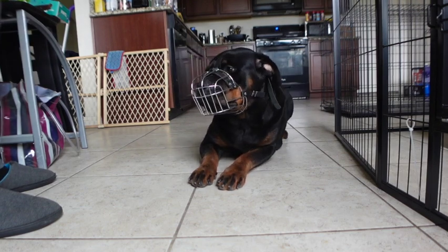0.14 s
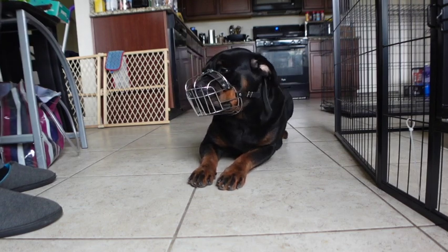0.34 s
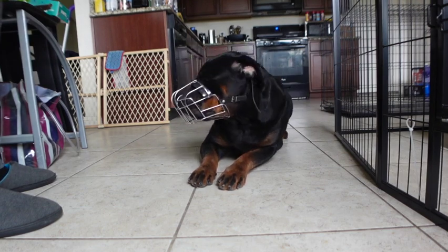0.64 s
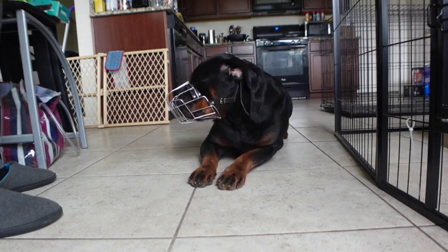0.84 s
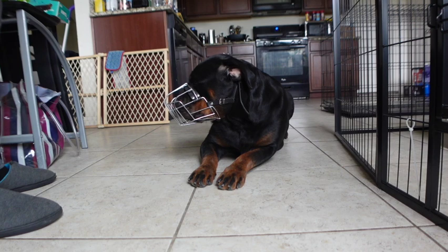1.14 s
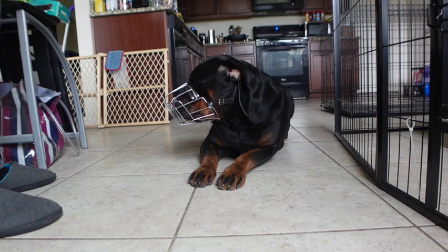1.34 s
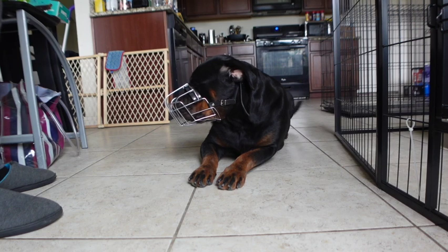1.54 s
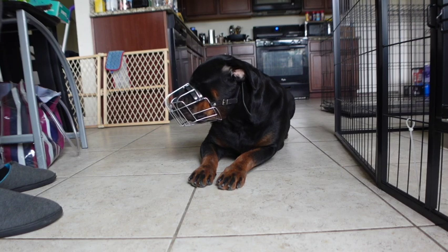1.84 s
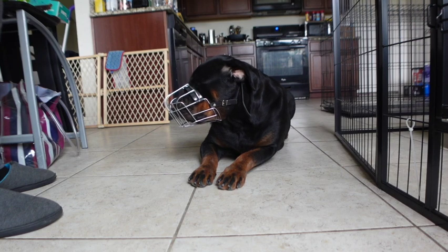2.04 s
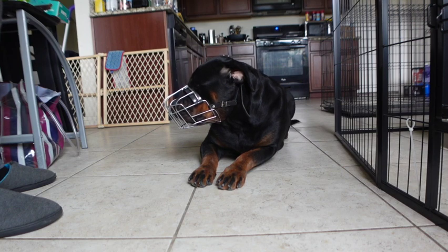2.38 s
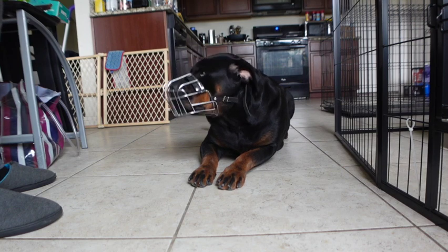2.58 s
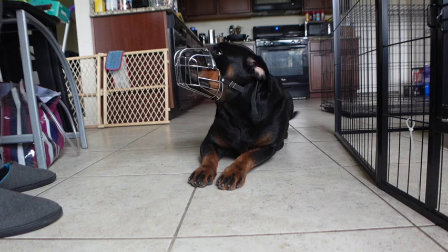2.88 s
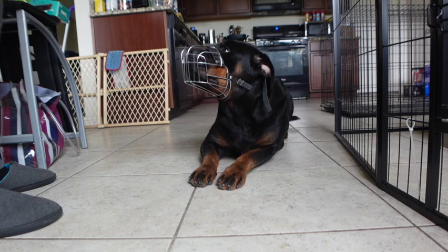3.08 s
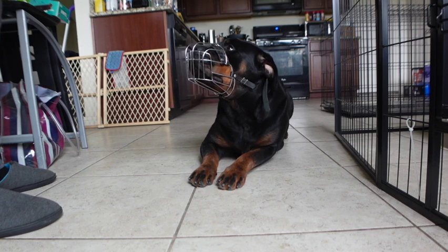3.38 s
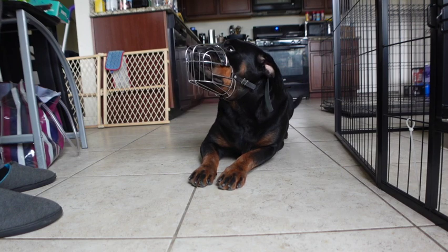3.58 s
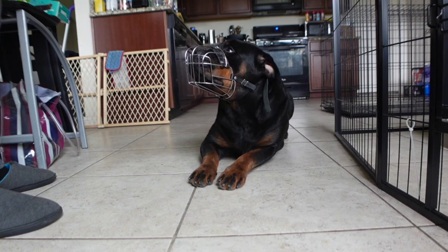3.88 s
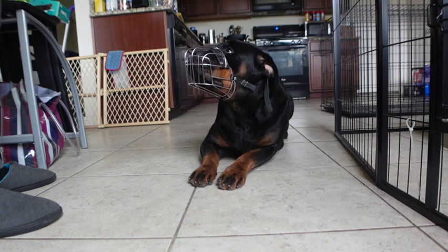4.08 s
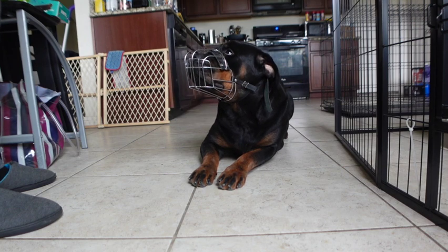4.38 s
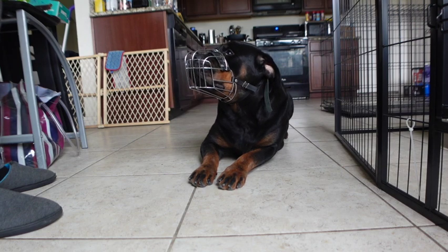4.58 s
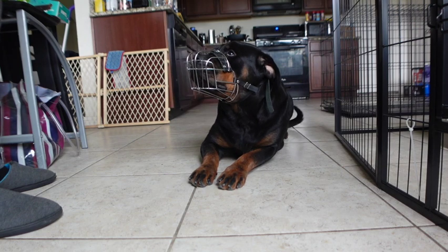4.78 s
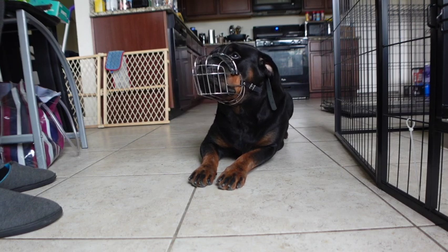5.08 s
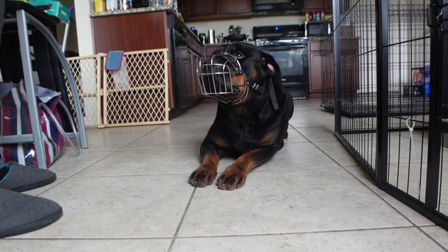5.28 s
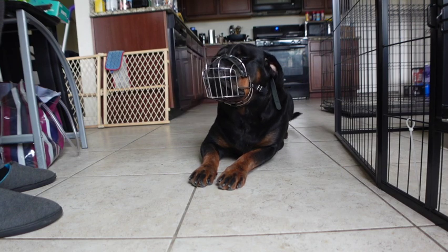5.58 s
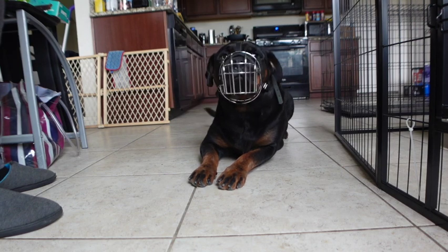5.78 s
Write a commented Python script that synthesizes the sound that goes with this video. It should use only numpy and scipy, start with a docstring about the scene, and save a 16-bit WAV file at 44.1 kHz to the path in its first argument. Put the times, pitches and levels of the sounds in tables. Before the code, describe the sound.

Several unseen young puppies cry in a hard tiled kitchen: a short rising whimper, a sharp yelp breaking into a shriek, a wavering wail, then a high squeal. After a faint paired whine come a falling yelp, trembling wails and long whines that sag and climb to the end. Low house hum, grainy uneven hiss, soft scuffs and small ticks sit beneath. The microphone is at some distance, so room echo is as loud as the voices.

```python
"""Hungry puppies cry in a tiled kitchen, one after another and sometimes two at once, over hum and uneven hiss.
First a rising whimper, a yelp into a shriek and squeal, a wavering wail crossed by a yip, and a high squeal.
Then faint paired whines, a falling yelp and a trembling wail; scuffs and ticks join the sagging, climbing whines.
Cries are gliding harmonics shaped by mouth and throat, with rasp and air, smeared by decaying room noise.
Scuffs and ticks are bursts of coloured noise; the hiss is continuous and grainy, the hum steady and low."""
import sys
import numpy as np
from scipy import signal
from scipy.fft import rfft, irfft, next_fast_len
from scipy.io import wavfile

SR = 44100
rng = np.random.default_rng(int(sys.argv[2]) if len(sys.argv) > 2 else 0)


def master_out(mix):
    """Clip the mix to full scale and print it as 16-bit PCM to the path in sys.argv[1]."""
    frames = np.transpose(np.atleast_2d(mix))
    ceiling = np.clip(frames, -1, 1)
    pcm = np.round(ceiling * 32767).astype(np.int16)
    wavfile.write(sys.argv[1], SR, pcm)


N = 261513
TIME = np.arange(N) / SR
TOP_HZ = 15900  # upper limit of the voices and of the recorder


def undb(db):
    """Turn decibels into gain."""
    return 10 ** (np.asarray(db) / 20)


def unit(x):
    """Scale to rms 1."""
    return x / np.sqrt(np.mean(x ** 2))


def at_hz(points, hz):
    """Read (hz, value) points on a log-frequency axis."""
    point_hz, value = np.transpose(points)
    return np.interp(np.log(np.maximum(hz, 1)), np.log(point_hz), value)


def bins(size):
    """Frequencies of a real spectrum, in Hz."""
    return np.arange(size // 2 + 1) * SR / size


def colour(x, points):
    """Filter by a (hz, gain_db) curve."""
    return irfft(rfft(x) * undb(at_hz(points, bins(len(x)))), len(x))


def band(x, lo_hz, hi_hz):
    """Keep one sharp-edged band."""
    hz = bins(len(x))
    return irfft(rfft(x) * ((hz >= lo_hz) & (hz < hi_hz)), len(x))


def resonance(hz, centre_hz, width_hz):
    """Gain of one resonance, 1 at its centre."""
    return 1 / (1 + (2 * (hz - centre_hz) / width_hz) ** 2)


def noise(centre_hz, width_hz, size=N):
    """Noise of rms 1 in one soft-edged resonance; centred on 0 it is a random wobble."""
    padded = next_fast_len(size, True)
    spectrum = rfft(rng.standard_normal(padded)) * resonance(bins(padded), centre_hz, width_hz)
    return unit(irfft(spectrum, padded)[:size])


def flicker(t, rate_hz):
    """A level that glides to a new random value rate_hz times a second."""
    knots = np.arange(t.min(), t.max(), 1 / rate_hz)
    return np.interp(t, knots, rng.standard_normal(len(knots)))


def stereo(mid, side, side_db):
    """Left and right from mid and side."""
    return mid + np.array([[1], [-1]]) * undb(side_db) * side


# spectrum of the house murmur: hz, gain_db
HUM_COLOUR = [(60, -10.5), (128, -12.5), (240, 4), (442, -6), (750, -3.5), (1980, -41)]
HUM_DB = -57.5  # mid level between 100 and 400 Hz


def hum():
    """Steady low murmur of the house: coloured noise, with a weaker independent side signal."""
    mid, side = (colour(rng.standard_normal(N), HUM_COLOUR) for _ in range(2))
    return stereo(mid, side, -11) * undb(HUM_DB) / np.std(band(mid, 100, 400))


# spectrum shared by the hiss and the ticks: hz, gain_db
HISS_COLOUR = [(100, -45), (850, 3.5), (1200, 13), (3400, 5.5), (5500, 4.5), (7500, 2), (15500, -2)]
# swells of the hiss: peak_s, rise_s, fall_s, level_db (from 5.8 to 7 kHz, before the trim)
HISS_SWELLS = [(.08, 0.14, 0.1, -51), (1.43, 0.089, 0.075, -51.5), (2.45, 0.024, 0.35, -54.5),
               (3.321, 0.0028, 0.12, -46.5), (3.75, 0.14, 0.44, -52), (4.44, 0.016, 0.94, -52.5),
               (4.8, 0.19, 0.038, -45.5), (5.08, 0.23, 0.17, -48), (5.601, 0.42, 0.03, -54),
               (5.899, 0.27, 0.092, -49.5)]
HISS_REST_DB = -59.5  # floor between swells, before the trim


def hiss(trim_db=-3.0, grain_db=1.0, flicker_db=1.5, crackle_db=2.0):
    """Grainy background hiss, continuous noise whose level rises and falls, sometimes abruptly."""
    roughness = undb(grain_db * noise(0, 4400) + crackle_db * noise(0, 480))
    grains = colour(rng.standard_normal(N) * roughness, HISS_COLOUR)
    grains = grains / np.std(band(grains, 5800, 7000))
    power = undb(HISS_REST_DB) ** 2
    for peak_s, rise_s, fall_s, level_db in HISS_SWELLS:
        distance = np.maximum((peak_s - TIME) / rise_s, (TIME - peak_s) / fall_s)
        power = power + (undb(level_db) * np.exp(-distance)) ** 2
    return grains * np.sqrt(power) * undb(trim_db + flicker_db * noise(0, 18))


# how long the kitchen rings: hz, reverberation_time_s
ROOM_RING = [(500, .59), (3000, 0.66), (8000, 0.56), (14000, 0.24)]


def room_tail(build_s=0.00031):
    """Dense reflections off tiles and cabinets, of unit energy; the highest treble dies first."""
    t = TIME[:SR]
    source = rng.standard_normal(SR)
    edges = np.geomspace(100, SR / 2, 10)
    tail = 0
    for lo, hi in zip(edges, edges[1:]):
        ring_s = at_hz(ROOM_RING, np.sqrt(lo * hi))
        tail = tail + band(source, lo, hi) * np.exp(-np.log(1000) * t / ring_s)  # 60 dB down at ring_s
    tail = tail * (1 - np.exp(-t / build_s))
    return tail / np.sqrt(np.sum(tail ** 2))


def kitchen(x, direct_db, wet_db, side_db=-10):
    """Direct sound plus the room, which reaches the two close microphones almost alike."""
    mid, side = (signal.fftconvolve(x, room_tail())[:N] for _ in range(2))
    return undb(direct_db) * x + undb(wet_db) * stereo(mid, side, side_db)


# small sharp ticks: start_s, level_db (before the trim and the colour)
TICKS = [(4.2214, -40), (4.962, -39), (5.0562, -36), (5.1275, -38), (5.833, -36), (5.855, -33.5)]


def ticks(decay_s=0.0026, trim_db=3):
    """Tiny hard contacts: noise that starts at once and dies within milliseconds."""
    blows = sum(undb(db + trim_db) * np.exp(-abs(TIME - s) / decay_s) * (TIME >= s) for s, db in TICKS)
    return colour(blows * rng.standard_normal(N), HISS_COLOUR)


# scuffs on the floor: peak_s, length_s, centre_hz, width_hz, level_db (before the patchiness)
SCUFFS = [(3.41, 0.06, 346, 125, -49), (4.043, 0.059, 5300, 1534, -46), (4.372, 0.12, 172, 71, -56.5),
          (5.03, 0.098, 1210, 940, -39), (5.072, 0.063, 3600, 2000, -44.5)]


def scuffs(patchy_db=3.5):
    """Short uneven scrapes, each noise in its own resonance under a bell-shaped swell."""
    patchy = undb(patchy_db * noise(0, 190))
    scrapes = 0
    for peak_s, length_s, centre_hz, width_hz, level_db in SCUFFS:
        swell = np.exp(-((TIME - peak_s) / length_s) ** 2)
        scrapes = scrapes + undb(level_db) * swell * noise(centre_hz, width_hz)
    return scrapes * patchy


# the mouth resonance favours the second or third harmonic; closing takes a share of the cry
MOUTH_WIDTH_HZ, CLOSING_SHARE = 493, 0.081
MOUTH_LEAK_DB = -9  # some of the second harmonic always gets past


def mouth_harmonics(pitch, closed, open_hz, closed_hz):
    """Gains of the second and third harmonics, trading strength as the mouth resonance and pitch move."""
    centre_hz = open_hz + (closed_hz - open_hz) * closed
    mouth = resonance(np.outer([2, 3], pitch), centre_hz, MOUTH_WIDTH_HZ)
    lower = mouth[0] + undb(MOUTH_LEAK_DB)
    return np.array([lower, mouth[1]]) / np.hypot(lower, mouth[1])


# the shrill top is beamed forward and fades as the puppies face away: time_s, level_db (above 7 kHz)
FACING = [(2.1, 5.5), (3.1, -10), (5.5, -19)]
SHRILL_BUILD_S, OVERTONE_FLICKER_DB, OVERTONE_FLICKER_HZ = .025, 3, 39.5


def throat_overtones(t, start, pitch, phase, k, throat):
    """Higher harmonics slide through fixed throat resonances, each flickering by itself."""
    weight = undb(at_hz(throat, k * pitch)) * (k * pitch < TOP_HZ)
    facing = undb(np.interp(t, *np.transpose(FACING)))
    shrill = facing * np.tanh(np.maximum(t - start, 0) / SHRILL_BUILD_S)
    beam = np.where(k * pitch > 7000, shrill, 1)
    uneven = undb(OVERTONE_FLICKER_DB * np.array([flicker(t, OVERTONE_FLICKER_HZ) for _ in k]))
    overtones = (beam * uneven * weight * np.sin(k * phase)).sum(axis=0)
    return overtones / np.sqrt((weight ** 2).sum(axis=0))


# brief narrow resonances of the muzzle: peak_s, length_s, centre_hz, level_db (relative to the cry)
MUZZLE_RINGS = [(1.1, .03, 2920, -1), (1.808, 0.054, 4243, -10), (4.16, .037, 4490, -10.5),
                (5.44, 0.047, 4305, -13), (5.6, 0.22, 3730, -23.5), (5.867, 0.097, 3200, -28)]
MUZZLE_WIDTH_HZ = 150


def muzzle_ring(t, pitch, phase, k):
    """A narrow muzzle resonance opens briefly and makes an overtone near it ring."""
    ring = 0
    for peak_s, length_s, centre_hz, level_db in MUZZLE_RINGS:
        opening = undb(level_db) * np.exp(-((t - peak_s) / length_s) ** 2)
        ring = ring + opening * resonance(k * pitch, centre_hz, MUZZLE_WIDTH_HZ)
    return (ring * np.sin(k * phase)).sum(axis=0)


# throat and muzzle above the third harmonic, mouth half closed: hz, gain_db
THROAT = [(2000, 61), (2750, 28), (3050, 7), (3500, 3), (3760, 14), (4020, 6.5), (4400, 11.5), (5200, -18),
          (6500, -44), (7500, 4), (8600, 20), (10200, 6), (12500, -5), (15000, -20)]
# the same with the mouth wide open: hz, gain_db
OPEN_THROAT = [(3200, 11.5), (3650, 10), (4500, -6.5), (5450, -3), (6300, -22), (7700, -12.5), (9800, -2.5),
               (11200, -16), (12600, -16), (14500, -36)]
# cries starting between these times, the shriek and the squeal after it, have the jaw wide open
WIDE_OPEN_FROM_S, WIDE_OPEN_TO_S = .45, .9
# each cry scoops up to its held pitch, swells, holds and fades; higher pitch is also louder
SCOOP_OCTAVES_PER_S, SCOOP_MAX_OCTAVES, FADE_DB, EFFORT_DB_PER_OCTAVE = 12, .63, 12.5, 3.5
# the body quivers, so loudness and pitch pulse together
QUIVER_HZ, QUIVER_WIDTH_HZ, QUIVER_DB, QUIVER_PITCH_SHARE = 19, 21, 0.78, .0025
# the lowest resonance of the throat carries the fundamental
PHARYNX_HZ, PHARYNX_WIDTH_HZ = 950, 730
ATTACK_S, RELEASE_S = .012, .01
# trim of overtones and air, their loss as the mouth closes, and air gain per unit of rasp
OVERTONE_TRIM_DB, CLOSED_DULL_DB, AIR_PER_RASP = -2, 6.5, 5.8


def cry(start, level_db, swell_s, swell_db, fade_s, fundamental_db, upper_db, open_hz, closed_hz,
        closes_s, tremor, rasp, half_db, held):
    """One squeal: trembling vocal folds, rasp around each harmonic and weak tones halfway between the lower ones."""
    held_s, held_hz = np.transpose(held)
    end = held_s[-1]
    on = (TIME > start - ATTACK_S) & (TIME < end + RELEASE_S)
    t = TIME[on]
    scoop = np.clip(SCOOP_OCTAVES_PER_S * (held_s[0] - np.maximum(t, start)), 0, SCOOP_MAX_OCTAVES)
    pitch = np.interp(t, held_s, held_hz) * 2 ** -scoop
    middle_pitch = np.median(pitch)

    swell = np.interp(t - start, [0, swell_s], [-swell_db, 0])
    fade = np.interp(end - t, [0, fade_s], [-FADE_DB, 0])
    effort = EFFORT_DB_PER_OCTAVE * np.log2(pitch / middle_pitch)
    envelope = undb(level_db + swell + fade + effort)

    closed = (1 + np.tanh((t - closes_s) / (CLOSING_SHARE * (end - start)))) / 2
    second, third = mouth_harmonics(pitch, closed, open_hz, closed_hz)
    first = undb(fundamental_db) * resonance(pitch, PHARYNX_HZ, PHARYNX_WIDTH_HZ)

    # slack folds, where the pitch is low, wobble most
    slack = (middle_pitch / pitch) ** 3
    quiver = noise(QUIVER_HZ, QUIVER_WIDTH_HZ, t.size)
    tremble = tremor * slack * noise(36.2, 60.7, t.size)
    pitch = pitch * (1 + tremble + QUIVER_PITCH_SHARE * quiver)

    # uneven cycles: timing and strength both scatter
    phase = 2 * np.pi * np.cumsum(pitch) / SR + .5 * rasp * noise(0, 920, t.size)
    strength = undb(QUIVER_DB * quiver) + rasp * noise(0, 250, t.size)
    voice = first * np.sin(phase) + second * np.sin(2 * phase) + third * np.sin(3 * phase)

    # alternating strong and weak cycles come and go
    doubling = undb(half_db) * second * noise(0, 720, t.size)
    voice = voice + doubling * np.cos(phase / 2) * (np.sin(phase) + np.sin(2 * phase))

    throat = OPEN_THROAT if WIDE_OPEN_FROM_S < start < WIDE_OPEN_TO_S else THROAT
    k = np.arange(4, 22)[:, None]  # harmonic numbers
    overtones = throat_overtones(t, start, pitch, phase, k, throat)
    voice = voice + muzzle_ring(t, pitch, phase, k)

    # breath noise passes the folds once a cycle, more in a hoarse cry
    breath = unit(colour(band(rng.standard_normal(t.size), 2600, TOP_HZ), throat))
    air = AIR_PER_RASP * rasp * breath * (1 + np.cos(phase)) / 2
    upper_gain = undb(upper_db + OVERTONE_TRIM_DB - CLOSED_DULL_DB * closed)
    voice = voice + upper_gain * (overtones + air)

    gate = np.interp(t, [start - ATTACK_S, start, end, end + RELEASE_S], [0, 1, 1, 0])
    out = np.zeros(N)
    out[on] = np.sqrt(2) * voice * envelope * strength * gate
    return out


# the cries: start_s, level_db, swell_s, swell_depth_db, fade_s, fundamental_db,
# overtones_db (before trim and dulling), mouth_open_hz, mouth_closed_hz,
# mouth_closes_s (midpoint, may lie outside the cry), tremor_share, rasp_share, half_pitch_db,
# held_pitch as (time_s, pitch_hz) points up to the end
CRIES = [ (-.02, -35.5, 0.023, 7.7, 0.096, 0.5, -9, 1520, 2130, 0.074, 0.0064, 0.12, -47, [(0, 569),
         (.05, 609), (.095, 736), (.15, 755)]),
         (.415, -35.5, 0.03, 10.6, .0033, -2.5, -20, 2220, 2490, 0.47, 0.015, 0.31, -45, [(.46, 880),
         (.49, 1008)]),
         (.486, -21.5, .014, 15, 0.063, -14.5, -5.5, 2595, 2300, 0.6, 0.0084, .018, -44, [(.487, 992),
         (.502, 930), (.522, 900), (.565, 920.6), (.603, 902), (.616, 812.6), (.675, 818)]),
         (.68, -27, 0.047, 1.6, 0.096, -4, -22, 2300, 2070, .79, 0.0059, .012, -50, [(.708, 1069),
         (.85, 1040)]),
         (1.075, -33, 0.066, 13, 0.051, 2.5, -20, 2206, 2160, 1.34, 0.021, 0.058, -34.5, [(1.15, 898),
         (1.195, 784), (1.28, 829.3), (1.32, 790), (1.395, 841.5), (1.43, 1101), (1.475, 972)]),
         (1.365, -38.5, .016, 6.1, .0031, -17, -13.5, 1500, 1650, 1.66, 0.046, .074, -24, [(1.405, 711),
         (1.46, 704)]),
         (1.73, -24, 0.13, 12.3, 0.0098, -3, -15.5, 2390, 2175, 1.76, 0.0086, 0.087, -23, [(1.732, 935.3),
         (1.77, 968.6), (1.8, 1100), (1.825, 1100)]),
         (1.82, -28.5, 0.0048, 1.3, 0.056, -3.5, -23.5, 2080, 1820, 2.2, 0.0041, 0.028, -23.5, [(1.822, 1099),
         (2.01, 1059), (2.105, 1030), (2.135, 902)]),
         (2.3, -37.5, 0.15, 13.4, 0.1, -6.5, -20.5, 1960, 1790, 2.52, .013, 0.071, -17, [(2.302, 682.4),
         (2.42, 709), (2.49, 733.2), (2.66, 722.2)]),
         (2.675, -42.5, 0.05, 12.4, 0.019, -10, -6, 1440, 1310, 2.73, 0.032, 0.17, -8, [(2.68, 667.6),
         (2.735, 567)]),
         (2.3, -45.5, 0.079, 6.4, 0.23, -3.5, -20, 2580, 2480, 2, 0.028, 0.14, -4, [(2.302, 731),
         (2.375, 918), (2.58, 962)]),
         (2.972, -31, 0.079, 20.3, .097, -2, -15.5, 2105, 2120, 3.7, 0.016, 0.12, -38, [(3.03, 864),
         (3.065, 880.3), (3.11, 707.5), (3.17, 556), (3.22, 488)]),
         (3.45, -28.5, 0.14, 9.1, 0.012, -3.5, -7, 2180, 1910, 3.6, 0.019, 0.083, -43, [(3.505, 898.6),
         (3.56, 828), (3.615, 848)]),
         (3.62, -22, 0.016, 3.6, 0.05, -10.5, -21, 1690, 1760, 3.84, 0.013, 0.045, -37, [(3.63, 907.3),
         (3.79, 873), (3.86, 826.7), (3.915, 766)]),
         (4.12, -27, 0.11, 13, 0.11, -13, -12.5, 2055, 1710, 4.23, 0.0054, 0.049, -37, [(4.121, 931),
         (4.16, 906), (4.2, 818.6), (4.26, 747), (4.38, 712.6)]),
         (4.36, -27.5, 0.084, 3.6, 0.035, -10, -44, 1500, 1660, 5.3, 0.0062, 0.026, -50, [(4.362, 725.7),
         (4.46, 816.5), (4.58, 887)]),
         (4.58, -25, 0.22, 7.3, 0.045, -19, -28, 1910, 1705, 4.45, 0.0024, 0.018, -51, [(4.581, 884),
         (4.67, 888.6), (4.75, 868.5), (4.9, 855)]),
         (4.16, -42.5, 0.024, 4.7, 0.072, -1, -24, 2200, 2050, 4.26, 0.014, 0.054, -7.5, [(4.165, 981.5),
         (4.24, 1096), (4.32, 1112)]),
         (4.495, -34, .045, 3.6, 0.045, -5, -26, 2180, 1550, 4.63, 0.02, 0.053, -24, [(4.53, 902.4),
         (4.57, 1014), (4.61, 928), (4.645, 715.6), (4.73, 696)]),
         (4.83, -41.5, 0.032, 11, 0.024, 1.5, -15, 1500, 1450, 4.86, 0.021, .04, -35, [(4.84, 731),
         (4.885, 688)]),
         (5.16, -30, 0.18, 13.2, 0.14, -10.5, -17.5, 1900, 2150, 5.23, 0.0066, .03, -18.5, [(5.162, 637.4),
         (5.39, 706.7), (5.44, 746), (5.56, 727)]),
         (5.5, -23.5, 0.2, 7.3, .005, -9, -19.5, 1730, 1440, 4.4, 0.0031, 0.03, -31.5, [(5.502, 728.2),
         (5.72, 775.4), (5.83, 798.5), (5.94, 793.8)])]


def litter():
    """All the puppies' cries, each row a trembling voice; some long cries run on through two rows in turn."""
    return sum(cry(*call) for call in CRIES)


def scene(pan_db=-1.04):
    """The litter sits a little to the right, far enough for the room to be as loud as the voices."""
    pan = undb(np.array([[pan_db], [-pan_db]]) / 2)
    mostly_direct = kitchen(hiss() + scuffs() + ticks(), direct_db=-1.0, wet_db=-28.5)
    far = kitchen(litter(), direct_db=-0.5, wet_db=-0.5, side_db=-10.5) * pan
    return hum() + mostly_direct + far


def record(dry):
    """The recorder drops the deep bass and cuts the top steeply."""
    thin = signal.sosfilt(signal.butter(3, 52, "high", fs=SR, output="sos"), dry)
    return signal.sosfilt(signal.ellip(10, .2, 80, TOP_HZ, fs=SR, output="sos"), thin)


dry = scene()
out = record(dry)
master_out(out)
```